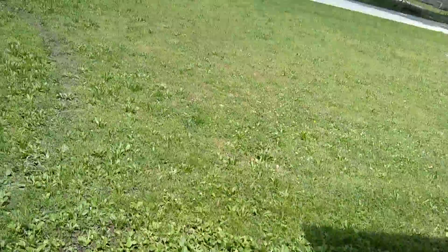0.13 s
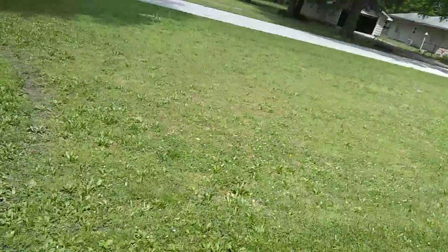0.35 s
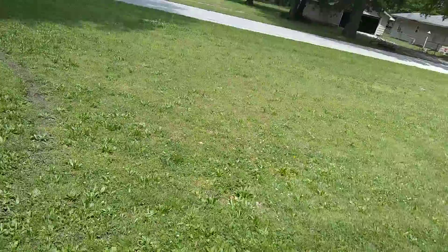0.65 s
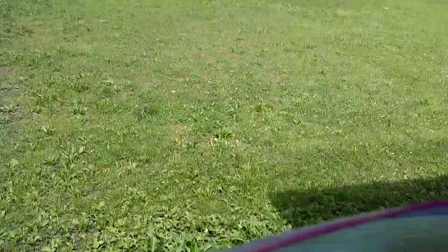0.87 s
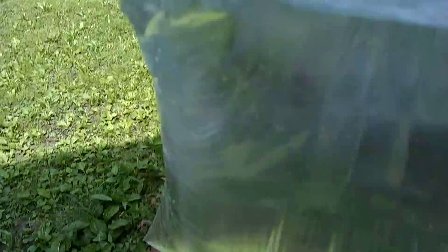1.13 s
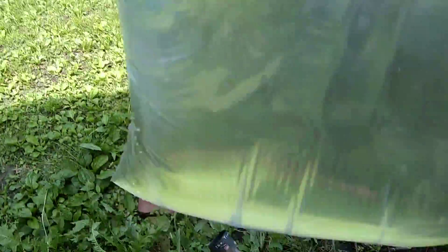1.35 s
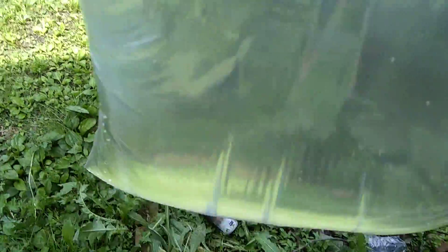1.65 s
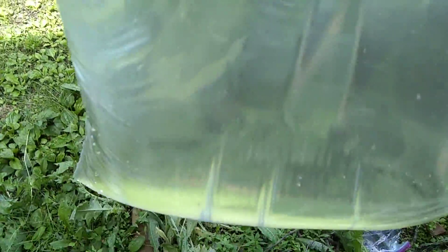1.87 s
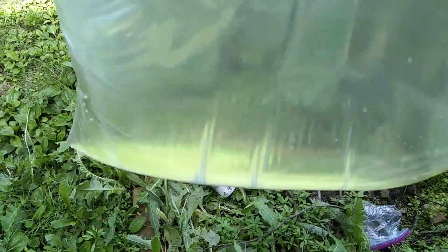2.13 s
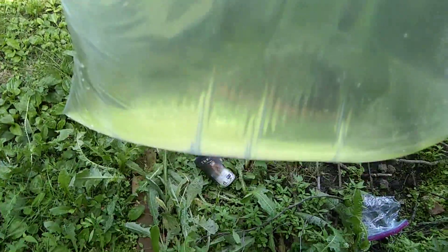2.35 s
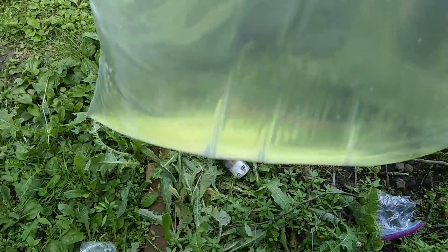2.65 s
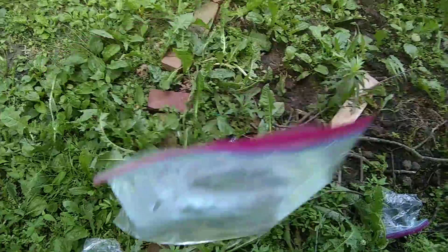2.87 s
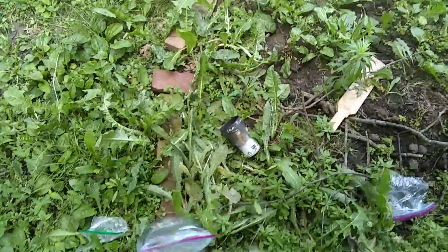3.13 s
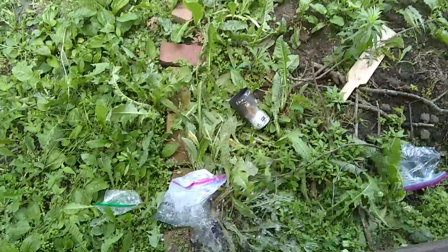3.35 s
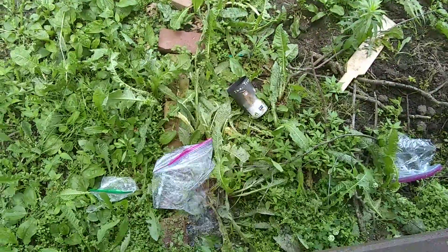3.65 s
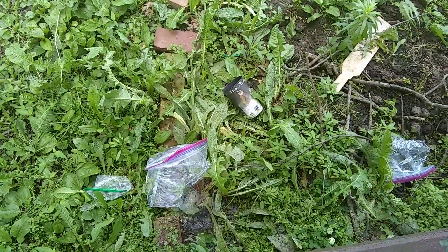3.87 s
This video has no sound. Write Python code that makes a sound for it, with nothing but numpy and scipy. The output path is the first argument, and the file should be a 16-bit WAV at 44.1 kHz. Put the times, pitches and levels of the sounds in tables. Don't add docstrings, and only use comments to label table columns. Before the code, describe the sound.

Outdoors on a lawn, close wide stereo: bright plastic rustles and snaps, a quick sliding release with a watery thud, a short pause, then a crisp wet splat and fading run-off over low road drone.

```python
import sys
import numpy as np
from scipy import signal
from scipy.fft import rfft, irfft
from scipy.io import wavfile

SR = 44100
rng = np.random.default_rng(int(sys.argv[2]) if len(sys.argv) > 2 else 0)


def field_ratio(decibels):
    return 10 ** (np.asarray(decibels, dtype=float) / 20)


def dump(signal):
    limited = np.clip(np.atleast_2d(signal).T, -1, 1)
    pcm = np.round(limited * 32767).astype(np.int16)
    wavfile.write(sys.argv[1], SR, pcm)


N = 176400


def in_time(rows):
    t_s, level_db = np.transpose(rows)
    return field_ratio(np.interp(np.arange(N) / SR, t_s, level_db, left=-120, right=-120))


def at_hz(points, hz):
    table_hz, value = np.transpose(points)
    return np.interp(np.log(hz), np.log(table_hz), value)


def rms_one(x):
    return x / np.sqrt(np.mean(x ** 2) + 1e-20)


def colour(white, spectrum):
    hz = np.arange(N // 2 + 1) * SR / N + 1
    return rms_one(irfft(rfft(white) * field_ratio(at_hz(spectrum, hz)), N))


def drift(rate_hz):
    r = np.exp(-2 * np.pi * rate_hz * 40 / SR)
    white = rng.standard_normal(N // 40 + 2002)
    slow = signal.lfilter([1], [1, -2 * r, r * r], white)[2000:]
    return np.interp(np.arange(N) / 40, np.arange(len(slow)), rms_one(slow))


def ring(x, hz, t60_s):
    r = field_ratio(-60 / (t60_s * SR))
    w = 2 * np.pi * min(hz, 0.45 * SR) / SR
    return signal.lfilter([0, np.sin(w)], [1, -2 * r * np.cos(w), r * r], x + 1e-18)


def ports(x, lag_samples, scatter):
    taps = scatter * rng.standard_normal((2, 40)) * np.exp(-np.arange(40) / 22.3)
    taps[:, 0] = 1
    taps /= np.sqrt(np.sum(taps ** 2, axis=1, keepdims=True))
    pair = [np.roll(x, int(round(lag_samples))), x]
    return np.array([signal.lfilter(h, 1, side) for h, side in zip(taps, pair)])


def grains(per_s, spread_db, wash, spectrum, cycles):
    level_db = spread_db * np.minimum(rng.exponential(1, (3, N)), 3.8)
    size = field_ratio(level_db) * rng.choice([-1, 1], (3, N))
    size = size * (rng.random((3, N)) < per_s / SR)
    dealt = rng.integers(0, 14, (3, N))
    crackle = 0
    for k, hz in enumerate(np.geomspace(spectrum[1][0], 14000, 14)):
        crackle = crackle + field_ratio(at_hz(spectrum, hz)) * hz * ring(size * (dealt == k), hz, cycles / hz)
    g = rms_one(crackle) + wash * colour(rng.standard_normal((3, N)), spectrum)
    return rms_one(g[0] + 1.74 * g[1:])


def swells(rows):
    t = np.arange(N) / SR
    power = 0
    for peak_s, level_db, rise_s, fade_s in rows:
        rise_db = 25 * np.maximum(peak_s - t, 0) / rise_s
        fade_db = 60 * np.maximum(t - peak_s, 0) / fade_s
        power = power + field_ratio(level_db - rise_db - fade_db) ** 2
    return np.sqrt(power)


def film_swishes():
    swishes = [(.078, -38, 0.0042, 0.024), (.125, -34.5, 0.057, 0.22), (.255, -46.5, .006, 0.17),
               (.33, -43.5, 0.14, 0.17), (.472, -29, .003, .3), (.466, -46, .12, .03),
               (.85, -41.5, 0.027, 0.1), (.955, -35, 0.093, 0.25), (1.113, -35.5, 0.0032, 0.013),
               (2.459, -43, 0.002, 0.047), (2.48, -49.5, .01, 0.26), (2.62, -48, 0.021, 0.046),
               (2.634, -44, 0.0094, 0.06), (2.683, -39, 0.013, 0.057)]
    # f/Hz, density/(dB per Hz)
    film_colour = [(500, -12), (2000, 8), (3200, -8), (6000, -3.5), (9000, 4.5), (11000, 11), (13000, 5),
                   (15000, -44)]
    return swells(swishes) * grains(6000, 3.5, 0.7, film_colour, cycles=14)


def finger_slip():
    slip = [
        (2.652, -29, .003, 0.05),
        (2.667, -29, 0.0059, 0.085),
        (2.6925, -17, 0.009, 0.11),
        (2.722, -25, 0.14, 0.035),
    ]
    # f/Hz, density/(dB per Hz)
    slip_colour = [(100, 8), (300, 9.5), (700, -11), (1500, -12), (3000, -13.5), (6000, -25), (11000, -18),
                   (15000, -34)]
    return swells(slip) * grains(6000, 3.2, 0.7, slip_colour, cycles=8)


def fold_snaps():
    # t/s, peak level/dB, centre f/Hz, ring/cycles
    snaps = [(.076, -31, 9000, 3), (.112, -27, 3150, 4), (.251, -33, 10000, 3), (.4703, -26, 11500, 12),
             (.8465, -28, 10000, 3), (.9323, -33, 10500, 6), (1.111, -25, 8500, 3), (1.4117, -30, 3100, 4),
             (1.7938, -40, 2730, 4), (2.117, -35, 1500, 3), (2.262, -39, 2200, 4), (2.4568, -33, 6000, 2),
             (2.4572, -21, 9800, 16), (2.4574, -14, 12300, 22), (2.4655, -28, 11600, 30),
             (2.6163, -31, 9300, 8), (2.6295, -29, 7000, 2), (2.6305, -33, 11000, 6),
             (2.6498, -25, 3500, 5), (2.682, -36, 12000, 12), (2.690, -23, 3200, 2), (2.6905, -20, 9000, 3),
             (2.692, -27, 11500, 6), (2.7025, -29, 5500, 5), (2.704, -31, 10500, 6),
             (2.7165, -31, 11500, 8), (2.7235, -28, 3300, 4), (2.7242, -25, 9500, 4),
             (3.1462, -23, 10000, 6), (3.1665, -22, 11500, 8), (3.1738, -8, 10100, 8),
             (3.1742, -12, 2800, 8), (3.1745, -11, 7600, 4), (3.1748, -14, 11500, 6),
             (3.193, -25, 5600, 14), (3.2035, -18, 11000, 10), (3.413, -39, 9000, 3), (3.476, -33, 9800, 8),
             (3.478, -35, 13000, 6), (3.5065, -47, 1700, 6), (3.509, -37, 4500, 1.5), (3.51, -36, 10000, 3),
             (3.7808, -36, 3300, 2), (3.782, -46, 10500, 6)]
    burst_s, trim_db, length = 0.0008, 5, 600
    out = np.zeros((2, N))
    for t_s, peak_db, hz, cycles in snaps:
        burst = rng.standard_normal(length) * np.exp(-np.arange(length) / (burst_s * SR))
        burst = ring(ring(burst, hz, cycles / hz), hz, cycles / hz)
        click = np.zeros(N)
        start = int(t_s * SR)
        click[start:start + length] = field_ratio(peak_db + trim_db) * burst / np.abs(burst).max()
        out += ports(click, lag_samples=2, scatter=0.17)
    return out


def water_thumps():
    # t/s, peak level/dB, f/Hz, t60/s
    thumps = [(1.412, -17.5, 350.6, 0.018), (2.649, -12, 850, 0.0054), (2.655, -18, 336, .03),
              (2.6655, -16.5, 301, 0.074), (2.691, -5.5, 487, 0.011), (2.692, -8.5, 238, 0.032),
              (3.173, -15.5, 310, 0.028), (3.1747, -9, 2080, 0.0097), (3.178, -23, 761, 0.015),
              (3.184, -19, 900, 0.027), (3.313, -37, 710, 0.018), (3.432, -34, 850, 0.018),
              (3.2135, -18, 1520, .012), (3.199, -10, 1700, 0.013)]
    out = np.zeros(N)
    for t_s, peak_db, hz, t60_s in thumps:
        hit = field_ratio(peak_db) * (np.arange(N) == int(t_s * SR))
        out += ring(hit, hz, t60_s)
    return ports(out, lag_samples=15.6, scatter=0.017)


def burst_spray():
    # t/s, level/dB
    burst = [
        (3.144, -59),
        (3.147, -31),
        (3.158, -34),
        (3.1625, -27.5),
        (3.1675, -20.5),
        (3.1715, -28.5),
        (3.1745, -8.5),
        (3.178, -18.5),
        (3.205, -35),
        (3.23, -45),
    ]
    # f/Hz, density/(dB per Hz)
    splash_colour = [(200, -5), (600, -1), (1700, -5.5), (3000, -11), (6000, -9), (9000, -8), (11000, -2),
                     (15000, -20)]
    return in_time(burst) * grains(9000, 3.2, 0.5, splash_colour, cycles=20)


def run_off():
    # t/s, level/dB
    drain = [(3.175, -42), (3.181, -21.5), (3.203, -26), (3.23, -31), (3.29, -41.5), (3.35, -45.5),
             (3.41, -41.5), (3.48, -42.5), (3.53, -49.5), (3.65, -52.5), (3.8, -61), (4.0, -66)]
    # f/Hz, density/(dB per Hz)
    drain_colour = [(200, -8), (700, -0.5), (1500, -9.5), (3000, -6.5), (6000, -11), (9000, -10.5),
                    (11000, -5), (15000, -16)]
    return in_time(drain) * grains(4000, 3.4, 0.8, drain_colour, cycles=18)


def birds():
    # t/s, length/s, start f/Hz, end f/Hz, level/dB
    chirps = [(0.445, 0.075, 2904, 2950, -39), (0.55, 0.046, 2970, 2850, -51),
              (0.806, 0.078, 2910, 2750, -47), (0.854, 0.05, 3300, 3000, -53),
              (1.086, 0.044, 2937, 2864, -42), (1.166, 0.042, 2950, 2900, -49),
              (1.295, 0.061, 3684, 3300, -49), (2.487, .02, 3290, 3300, -55.5),
              (2.199, 0.037, 3400, 3450, -54.5), (2.238, 0.054, 3450, 3050, -43),
              (2.573, 0.088, 2790, 2800, -54), (2.725, 0.057, 2790, 2750, -52),
              (2.771, 0.043, 3616, 3400, -49), (2.804, 0.038, 3430, 3150, -45.5),
              (2.845, 0.041, 3400, 3380, -57)]
    wobble_hz = 60 * drift(54)
    out = np.zeros(N)
    for t_s, length_s, start_hz, end_hz, level_db in chirps:
        i = int(t_s * SR)
        u = np.linspace(0, 1, int(length_s * SR))
        hz = start_hz + (end_hz - start_hz) * u + wobble_hz[i:i + len(u)]
        whistle = np.sin(2 * np.pi * np.cumsum(hz) / SR)
        out[i:i + len(u)] += field_ratio(level_db) * np.sin(np.pi * u) * whistle
    out = out * field_ratio(2.5 * drift(90))
    blurred = out + 0.3 * np.roll(out, 900) + 0.12 * np.roll(out, 2100)
    return ports(blurred, lag_samples=1, scatter=0.15)


def motor():
    # t/s, firing f/Hz, level/dB
    firing = [(0, 60.65, -36), (.4, 74.6, -54), (0.8, 95, -41), (1.0, 104, -38), (1.299, 110.9, -42),
              (2.002, 116.9, -42), (3.15, 120.3, -48.5), (3.301, 120.5, -71), (4, 115.7, -57.5)]
    t_s, firing_hz, level_db = np.transpose(firing)
    hz = np.interp(np.arange(N) / SR, t_s, firing_hz) * (1 + 0.0398 * drift(7.94))
    phase = 2 * np.pi * np.cumsum(hz) / SR
    tone = np.sin(phase) + 0.46 * np.sin(2 * phase) + 0.33 * np.sin(3 * phase)
    level = field_ratio(8 + 0.78 * drift(21)) * in_time(np.c_[t_s, level_db])
    return ports(level * tone, lag_samples=5.1, scatter=0.14)


def drone():
    # t/s, level/dB
    drone_level = [(0.0, -37), (0.38, -37), (1.08, -37.5), (1.49, -41), (1.76, -39), (2.57, -40.5),
                   (2.7, -45.5), (3.07, -42), (3.25, -53), (3.49, -57), (3.73, -57), (4.0, -54)]
    # f/Hz, density/(dB per Hz)
    drone_colour = [(30, 0), (100, 1), (300, -2.5), (700, -16.5), (1500, -20), (3500, -28.5), (6000, -37),
                    (14000, -40)]
    # f/Hz, width/Hz, gain
    humps = [(92.5, 18.3, 0.95), (252, 42, 0.75), (309, 11, 0.71), (417, 18, 0.56), (942, 61, 1.04),
             (1620, 51, 0.37), (2660, 290, 0.46)]
    # f/Hz, likeness/(0-1)
    likeness = [(25, .88), (45, .999), (140, .998), (300, 0.97), (1000, 0), (3000, 0.02), (12000, 0)]
    edges_hz = 25 * 2 ** np.arange(0, 9.6, 0.5)
    together = drift(4)
    white = rng.standard_normal((2, 2, N))
    out = 0
    for k, (low, high) in enumerate(zip(edges_hz, edges_hz[1:])):
        band = signal.butter(2, [low, high], "band", fs=SR, output="sos")
        mid, side = signal.sosfilt(band, white[k % 2])
        hz = np.sqrt(low * high)
        alike = np.clip(at_hz(likeness, hz), 0, 0.999)
        gain = field_ratio(at_hz(drone_colour, hz) + 0.7 * together + 1.2 * drift(10))
        out = out + gain * (np.sqrt(1 + alike) * mid + np.sqrt(1 - alike) * side * [[1], [-1]])
    for hz, width_hz, gain in humps:
        r = np.exp(-np.pi * width_hz / SR)
        poles = [1, -2 * r * np.cos(2 * np.pi * hz / SR), r * r]
        out = out + gain * signal.lfilter([(1 - r * r) / 2, 0, (r * r - 1) / 2], poles, out)
    return field_ratio(7.5) * in_time(drone_level) * rms_one(out)


def scene():
    bag = film_swishes() + finger_slip() + fold_snaps()
    water = water_thumps() + burst_spray() + run_off()
    no_bass = signal.butter(2, 110, "high", fs=SR, output="sos")
    return signal.sosfilt(no_bass, bag + water) + birds() + motor() + drone()


def roll_off(x):
    return signal.sosfilt(signal.butter(12, 15690, fs=SR, output="sos"), x)


def record(dry):
    # f/Hz, density/(dB per Hz)
    hiss_colour = [(1000, -7), (2600, -11), (4000, 2.5), (6000, 2), (11000, 4.5), (14000, -4)]
    hiss_db, port_trim_db = -60.5, -2
    cross_gain, cross_s, cross_cut_hz = 0.995, 21 / 48000, 7200
    hiss = field_ratio(hiss_db) * colour(rng.standard_normal((2, N)), hiss_colour)
    heard = (dry + hiss) * field_ratio([[port_trim_db / 2], [-port_trim_db / 2]])
    hz = np.arange(N // 2 + 1) * SR / N
    cross = cross_gain * np.exp(-2j * np.pi * hz * cross_s) / (1 + (hz / cross_cut_hz) ** 6)
    wide = 0.68 * (heard - irfft(rfft(heard[::-1]) * cross, N))
    limited = 1.5 * np.tanh(wide / 1.5)
    top_cut = signal.cheby2(16, 44, 14650, fs=SR, output="sos")
    return roll_off(signal.sosfilt(top_cut, limited))


dry = scene()
out = record(dry)
dump(out)
```